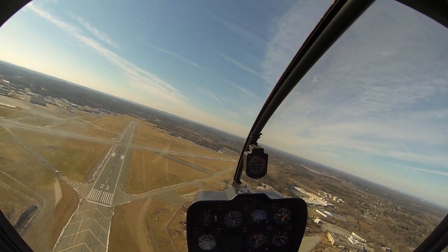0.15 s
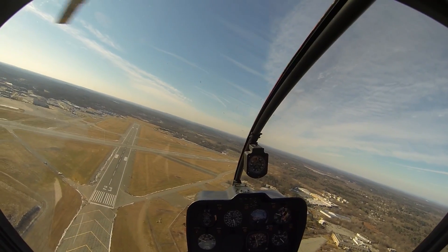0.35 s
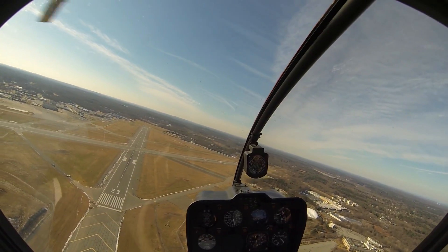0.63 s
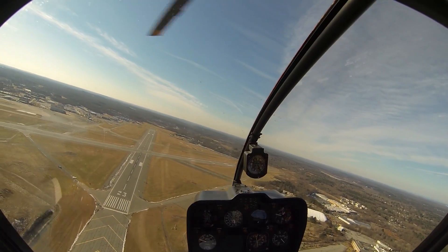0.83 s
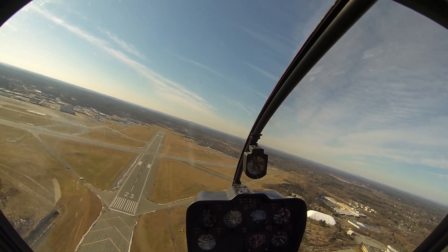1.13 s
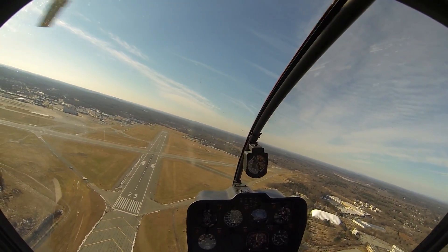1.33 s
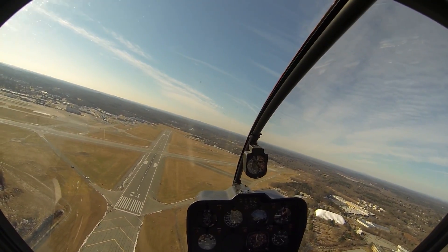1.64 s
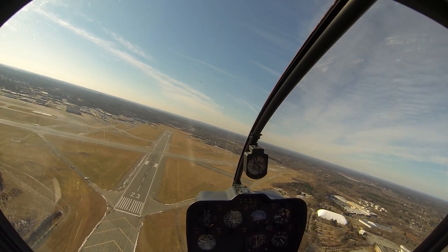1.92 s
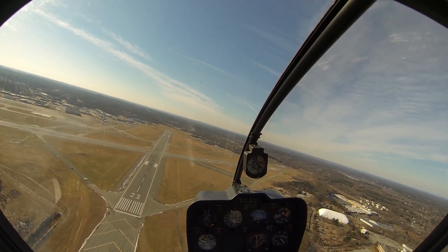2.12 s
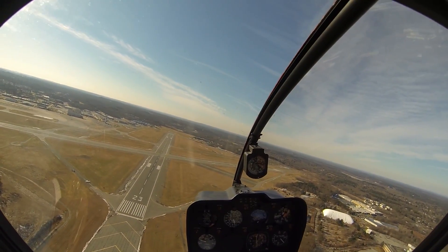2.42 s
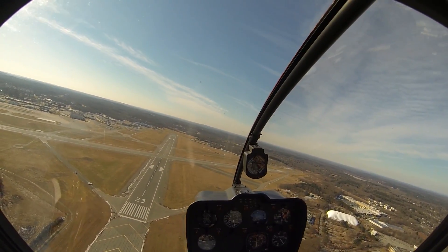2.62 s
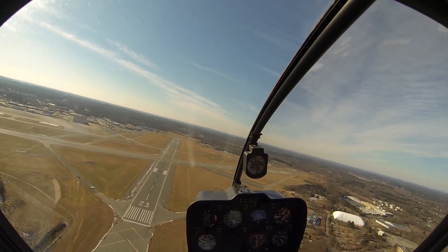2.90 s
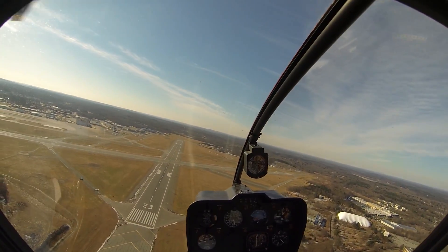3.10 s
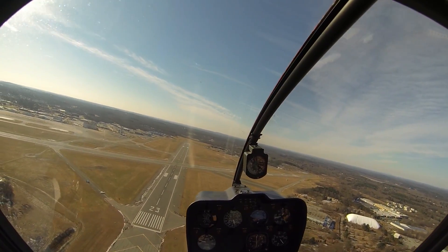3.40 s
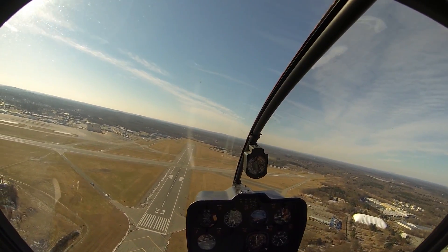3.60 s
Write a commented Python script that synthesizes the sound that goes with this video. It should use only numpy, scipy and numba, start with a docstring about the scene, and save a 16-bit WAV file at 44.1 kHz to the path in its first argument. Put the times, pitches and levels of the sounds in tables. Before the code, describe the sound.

Inside a small helicopter cabin, a close camera microphone picks up constant deep rotor throbbing with irregular harder slaps, low buffeting wind roar, humming shafts and a thin whine, its level dipping briefly on the loudest beats.

```python
"""A two-bladed helicopter thumps in steady flight, heard inside the cockpit by a small camera.
Each blade pass is a pressure dip built from cosines, with sharper slaps and peaks at listed times.
Shafts, gears and tail rotor hum and whine as sines that share one drifting speed. Shaped noise roars and
hisses round the cabin with the gusts, and a narrow band of noise makes a thin wandering whistle.
The camera steps its gain down abruptly on the highest peaks and adds its own faint whistles and hiss."""
import sys
import numpy as np
from scipy import signal
from scipy.fft import rfft, irfft, next_fast_len
from scipy.io import wavfile
from scipy.ndimage import uniform_filter1d, map_coordinates
from numba import njit

SR = 44100
rng = np.random.default_rng(int(sys.argv[2]) if len(sys.argv) > 2 else 0)


def unload_wav(signal):
    """Save mono or channel-first audio to the path in sys.argv[1] as 16-bit WAV at rate SR, clipped to [-1, 1]."""
    wavfile.write(
        sys.argv[1],
        SR,
        np.round(np.clip(np.atleast_2d(signal).T, -1, 1) * 32767).astype(np.int16),
    )


def gain_from_decibels(decibels):
    """Convert decibel values to linear amplitude factors."""
    exponent = np.asarray(decibels, float) / 20
    return 10 ** exponent


N = 165375  # samples

# The drivetrain's speed as gear mesh pitch. Each row: time in seconds, mesh pitch in Hz.
MESH_SPEED = [(0, 1208), (.2, 1212), (.45, 1218), (.7, 1221), (.95, 1221), (1.2, 1216), (1.5, 1213),
              (1.8, 1209), (2.2, 1207), (2.7, 1206), (3.2, 1206), (3.5, 1208), (3.75, 1210)]
# Extra-hard blade slaps. Each row: centre in seconds, depth of the pressure dip in dB.
BLADE_SLAPS = [(0.11, -15.5), (0.3185, -11.5), (0.531, -16), (1.0885, -8.5), (1.228, -12.5), (1.37, -14.5),
               (1.5139, -14.5), (1.581, -14.5), (1.8633, -9.5), (1.932, -12.5), (2.291, -16), (2.638, -5.5),
               (2.7804, -14), (2.852, -20), (2.926, -13.5), (2.9984, -10), (3.137, -12.5), (3.424, -10.5),
               (3.492, -24), (3.628, -11.5), (3.701, -16.5)]
# Sharp upward pressure peaks. Each row: centre in seconds, height in dB.
PRESSURE_PEAKS = [(.281, -10), (0.625, -10), (.691, -14.5), (1.357, -12.5), (2.3858, -12.5), (2.739, -7.5),
                  (3.2353, -9.5), (3.59, -13.5)]


def over_time(rows):
    """One value per sample for each column after the time."""
    seconds, *columns = np.transpose(rows)
    return [np.interp(np.arange(N) / SR, seconds, column) for column in columns]


def along(points, hz):
    """Interpolates (Hz, value) points on a log frequency axis."""
    f, v = np.transpose(points)
    return np.interp(np.log(hz + 1), np.log(f + 1), v)


def wobble(rate):
    """A smooth random curve through normal knots, rate knots a second (59 at most)."""
    knots = rng.standard_normal(int(N * 60 / SR) + 4)
    return map_coordinates(knots, [np.arange(N) * min(rate, 59) / SR])


def bump(t, centre, half_width):
    """A Gaussian pulse of height 1, all in seconds."""
    return np.exp(-0.5 * ((t - centre) / half_width) ** 2)


def air(spectrum, patchy_db):
    """Turbulent noise of rms 1: patches of random gain in time and pitch, then a spectral shape."""
    z = signal.stft(rng.standard_normal(N + 1024), nperseg=512)[2]
    field = uniform_filter1d(rng.standard_normal(z.shape), size=5, axis=0)  # smooth over pitch
    field = uniform_filter1d(field, size=8, axis=1)  # smooth over time
    noise = signal.istft(z * gain_from_decibels(patchy_db * field / field.std()), nperseg=512)[1]
    m = next_fast_len(len(noise))
    shape = gain_from_decibels(along(spectrum, np.fft.rfftfreq(m, 1 / SR)))
    shaped = irfft(rfft(noise, m) * shape, m)[:N]
    return shaped / shaped.std()


def electronics_hiss():
    """Steady noise of the camera's electronics."""
    # Each row: frequency in Hz, relative noise density in dB per Hz.
    hiss_shape = [(3000, -32.5), (5500, -5), (7000, -2), (10000, -1.5), (11500, -6.5), (14500, -9.5),
                  (16000, -10)]
    return gain_from_decibels(-72.5) * air(hiss_shape, patchy_db=-0.2)


def electronics_whistles():
    """Faint fixed sines from the camera's electronics."""
    # Each row: frequency in Hz, level in dB rms.
    clock_tones = [(9001, -97.5), (11999, -96), (13001, -94), (14998, -97.5)]
    t = np.arange(N) / SR
    return sum(np.sqrt(2) * gain_from_decibels(db) * np.sin(2 * np.pi * hz * t) for hz, db in clock_tones)


def whistle():
    """A thin airy whistle: a narrow band of noise carried on a gliding pitch."""
    # Each row: time in seconds, centre pitch in Hz, level in dB rms.
    glide_path = [(0, 13500, -100), (.3, 13600, -84), (.42, 13800, -96), (.58, 14000, -82),
                  (.72, 14200, -98), (1, 14800, -87), (1.3, 14500, -99), (2.55, 14300, -94),
                  (2.85, 14350, -83), (3.15, 13850, -82), (3.45, 13600, -84), (3.62, 13100, -82),
                  (3.75, 13000, -85)]
    hz, db = over_time(glide_path)
    low_pass = signal.butter(2, 200, fs=SR, output="sos")  # reaches 200 Hz either side of the pitch
    fuzz = signal.sosfilt(low_pass, rng.standard_normal((2, N)))
    phase = 2 * np.pi * np.cumsum(hz) / SR
    return gain_from_decibels(db) * (fuzz[0] * np.cos(phase) + fuzz[1] * np.sin(phase)) / fuzz.std()


def airflow(passes):
    """Cabin roar and slipstream hiss follow the gusts, lightly chopped by the downwash."""
    # Air strength. Each row: time in seconds, gain in dB.
    gusts = [(0, -2), (.15, -3), (.3, -3), (.4, -1.5), (.5, 2.5), (.57, 0.5), (.64, 3.5), (.7, -2.5),
             (.88, 1.5), (1.1, 0), (1.3, 0.5), (1.5, -0.5), (1.85, -0.5), (2.05, 2.8), (2.11, -3),
             (2.22, 1.1), (2.41, -0.5), (2.55, 1.5), (2.635, 4), (2.66, -2.5), (2.78, -0.5), (2.92, 1.05),
             (3.1, -0.5), (3.4, 1), (3.75, -3)]
    # Cabin roar. Each row: frequency in Hz, relative noise density in dB per Hz.
    roar_shape = [(7, -25.5), (14, -15.5), (22, -11), (36, -2.5), (52, -7), (74, -10), (120, -6.5),
                  (195, -7.5), (248, -8.5), (275, -12.5), (310, -12.5), (412, -14.5), (569, -19.5),
                  (802, -21), (1060, -28), (1180, -35.5), (1300, -42), (1500, -46), (1950, -65.5),
                  (3300, -120)]
    # Slipstream hiss. Each row: frequency in Hz, relative noise density in dB per Hz.
    rush_shape = [(700, -18), (1200, -7), (1390, -10.5), (1840, -8.5), (2420, -16.5), (2910, -12.5),
                  (4430, -26), (5000, -30), (5800, -32), (7000, -41.5), (10000, -47), (13000, -52.5),
                  (16000, -56.5), (20000, -68)]
    roar_db, rush_db, chop_db = -19, -41.5, 0.7  # base levels; swell with each blade
    flare_db, flare_s = 5, 0.0028  # the hiss flares with slaps and peaks; half width
    t = np.arange(N) / SR
    air_db = over_time(gusts)[0] + chop_db * np.cos(2 * np.pi * passes + 2.2)
    flare = sum(bump(t, s, flare_s) for s, _ in BLADE_SLAPS + PRESSURE_PEAKS)
    roar_gain = gain_from_decibels(roar_db + air_db + 0.38 * wobble(9))
    rush_gain = gain_from_decibels(rush_db + 0.84 * air_db + flare_db * flare + 0.33 * wobble(16))
    return roar_gain * air(roar_shape, patchy_db=0.7) + rush_gain * air(rush_shape, patchy_db=1.16)


def mesh_cycles():
    """Gear mesh cycles of the common speed, counted from a moment when a blade is overhead."""
    blade_overhead_s = 1.8655
    mesh_hz = over_time(MESH_SPEED)[0] + 1.3 * wobble(11)  # slow drift plus quick hunting
    cycles = np.cumsum(mesh_hz) / SR
    return cycles - cycles[round(blade_overhead_s * SR)]


def drivetrain(cycles):
    """Shaft, gear and tail rotor tones, each fluttering and wavering alone; load shifts some levels."""
    # Each row: share of the mesh pitch, level in dB rms, pitch flutter in Hz, level waver in dB,
    # gain in dB for every Hz that load drags the mesh pitch down.
    shaft_tones = [(.02821, -24.5, 0.18, -0.5, -0.5), (0.0573, -39.5, 0.35, 0, -1.5),
                   (.08505, -25.5, 0.35, 1, -0.15), (0.1268, -27.5, 0.74, 0.5, 0.16),
                   (.169, -34, 0.91, 1, 0), (.183, -44.5, 1.1, 6, 0.5), (.209, -27.5, 0.91, 1.2, 0),
                   (0.2735, -34.5, 1.5, 2.5, 0.59), (0.2786, -41, 0.61, 2, 0),
                   (0.3127, -41.5, 0.86, 4, -0.5), (0.3341, -34.5, 1.2, 1.5, 0.54),
                   (.394, -39.5, 1.3, 2.5, 0.27), (0.427, -45, 1.5, 2, 0), (0.667, -43, 8, 0.5, 0),
                   (.81, -52.5, 4.7, 5, -0.5), (0.9393, -45, 1.2, 4.5, 0.14)]
    drag_hz = 1212 - over_time(MESH_SPEED)[0]  # below the mesh pitch at middle load
    total = np.zeros(N)
    for share, db, flutter_hz, waver_db, load_db in shaft_tones:
        level_db = db + waver_db * np.tanh(wobble(7)) + 1.1 * wobble(25) + load_db * drag_hz
        flutter = np.cumsum(flutter_hz * wobble(14)) / SR
        turns = share * cycles + rng.random() + flutter
        total += np.sqrt(2) * gain_from_decibels(level_db) * np.sin(2 * np.pi * turns)
    return total


def whine(cycles):
    """The gear mesh tone itself, a sine whose level and phase waver."""
    # Each row: time in seconds, level in dB rms.
    mesh_level = [(0, -42), (.1, -46.5), (.3, -50), (.63, -48), (.9, -48), (1.1, -52), (1.22, -45.5),
                  (1.5, -48.5), (1.7, -43), (2.05, -47.5), (2.25, -39.5), (2.4, -48), (2.55, -40),
                  (2.68, -44.5), (2.8, -39.5), (3.25, -40.5), (3.5, -44), (3.75, -47.5)]
    level_db = over_time(mesh_level)[0] + 0.72 * wobble(14)
    return np.sqrt(2) * gain_from_decibels(level_db) * np.sin(2 * np.pi * cycles + 0.41 * wobble(14))


def rotor(passes):
    """Every blade pass is a suction dip, slightly unlike the last; slaps deepen it, peaks push back."""
    # The dip's harmonics. Each row: multiple of the blade rate, level in dB rms before the throb.
    dip_harmonics = [(1, -25), (2, -33), (3, -32), (4, -19.5), (6, -28)]
    # Blade loading. Each row: time in seconds, gain in dB.
    throb = [(0, -0.5), (.3, -5), (.6, -2.5), (.8, 2), (1, -4), (1.25, 2), (1.6, -1), (2.1, 2), (2.5, 1),
             (2.9, 0.5), (3.3, 0), (3.75, -1)]
    slap_s, peak_s = 0.002, 0.0018  # half widths
    t = np.arange(N) / SR
    beat = np.zeros(N)
    for multiple, db in dip_harmonics:
        level = np.sqrt(2) * gain_from_decibels(db + 0.61 * wobble(2.4))
        beat -= level * np.cos(2 * np.pi * multiple * passes + 0.2 * wobble(2.5))
    slaps = sum(gain_from_decibels(db) * bump(t, s, slap_s) for s, db in BLADE_SLAPS)
    peaks = sum(gain_from_decibels(db) * bump(t, s, peak_s) for s, db in PRESSURE_PEAKS)
    return beat * gain_from_decibels(over_time(throb)[0]) - slaps + peaks


@njit
def stepped_gain(x, top, step, holds, climb, most, glide):
    """Steps down fast while the output is over the top, climbs back one step at a time."""
    out, gain, wanted, wait = np.empty_like(x), 1.0, 1.0, 0.0
    for i in range(len(x)):
        wait -= 1
        if abs(x[i]) * wanted > top:
            # a loud peak also cuts short the long wait between upward steps
            if wait <= 0 or wait > 3 * holds[i]:
                wanted, wait = wanted * step, holds[i]
        elif wait <= 0:
            wanted, wait = min(wanted / step, most), climb
        gain += glide * (wanted - gain)
        out[i] = x[i] * gain
    return out


def gain_control(x):
    """The camera's automatic gain, moving in small quick steps."""
    top_db, most_db = -8, 2.4  # threshold, gain ceiling
    step_db, step_s = 0.17, 0.00015  # one step, mean wait between steps down
    climb_db_per_s = 22
    holds = step_s * SR * rng.uniform(0.8, 1.2, N)  # samples
    climb = step_db / climb_db_per_s * SR  # samples between steps up
    # glide: share of the remaining step taken each sample
    return stepped_gain(x, gain_from_decibels(top_db), gain_from_decibels(-step_db), holds, climb, gain_from_decibels(most_db), glide=0.45)


def scene():
    """All sources at the one microphone."""
    cycles = mesh_cycles()
    passes = cycles / 85.4  # mesh cycles per blade pass
    mix = airflow(passes) + whistle() + drivetrain(cycles) + whine(cycles) + rotor(passes)
    return mix[None]


def roll_off(x):
    """The treble ends steeply here."""
    return signal.sosfilt(signal.butter(12, 15750, fs=SR, output="sos"), x)


def record(dry):
    """The camera's low cut and gain control, then its electronics' whistles and hiss."""
    low_cut = signal.butter(1, 5.5, "high", fs=SR, output="sos")  # Hz
    x = gain_control(signal.sosfilt(low_cut, dry[0]))
    x = x + electronics_whistles() + electronics_hiss()
    return roll_off(x[None])


dry = scene()
out = record(dry)
unload_wav(out)
```